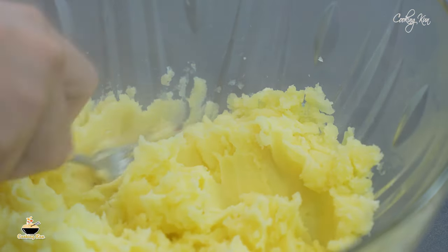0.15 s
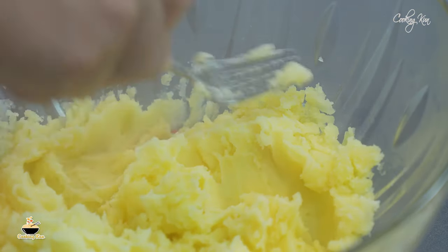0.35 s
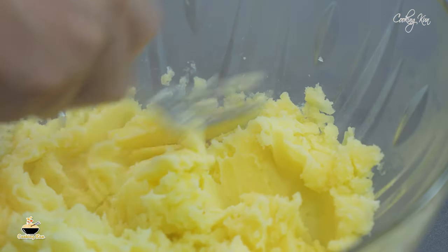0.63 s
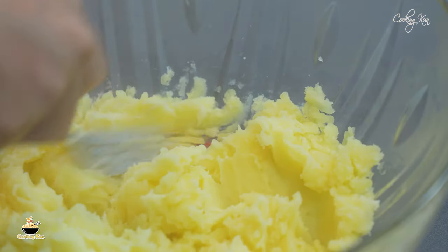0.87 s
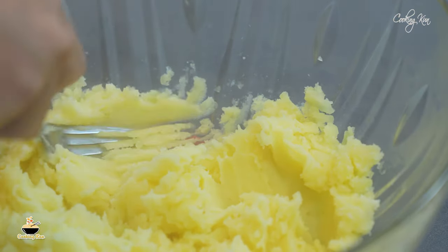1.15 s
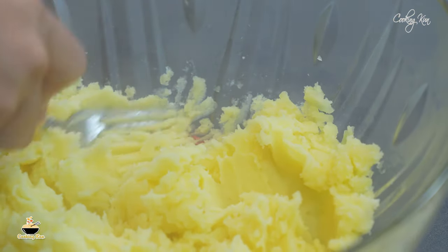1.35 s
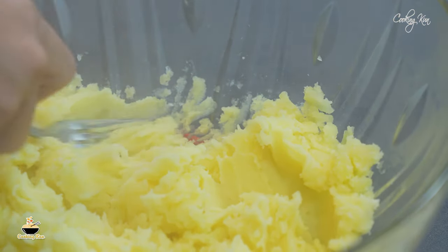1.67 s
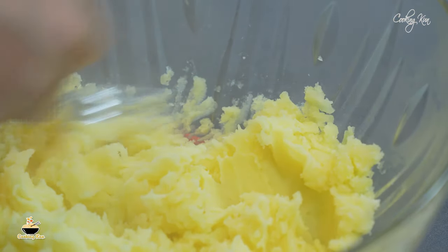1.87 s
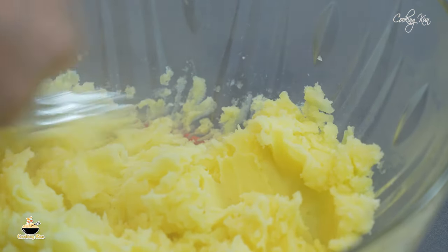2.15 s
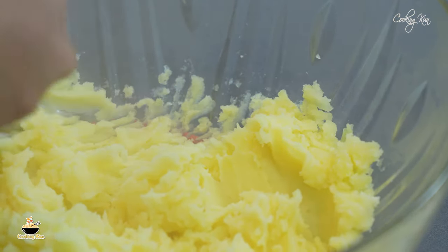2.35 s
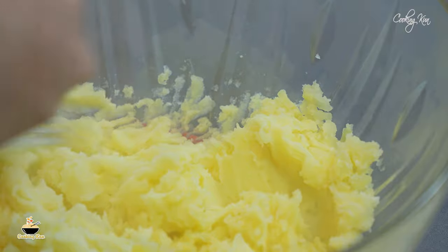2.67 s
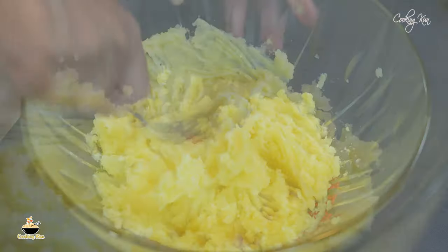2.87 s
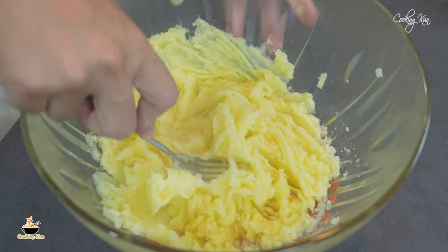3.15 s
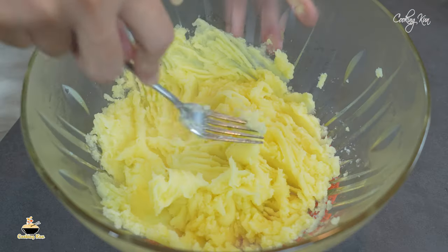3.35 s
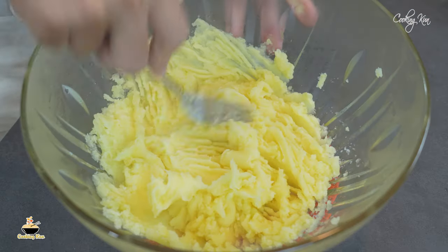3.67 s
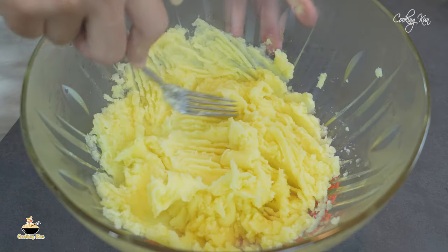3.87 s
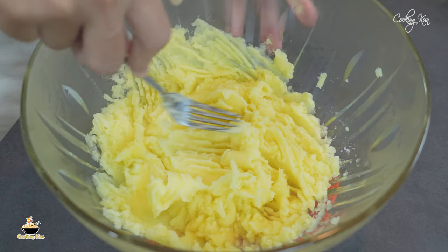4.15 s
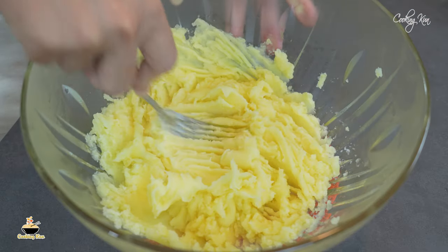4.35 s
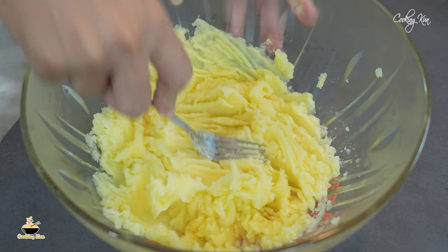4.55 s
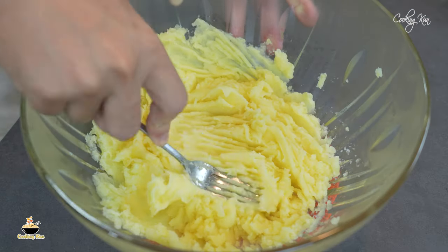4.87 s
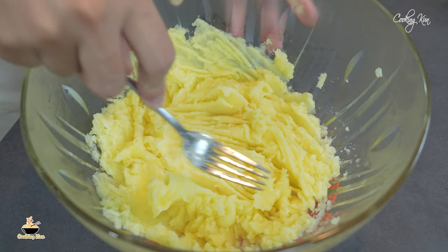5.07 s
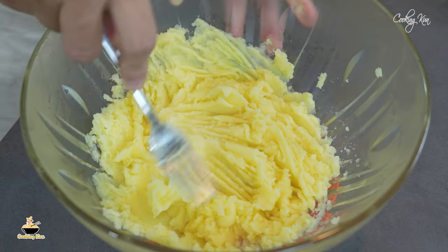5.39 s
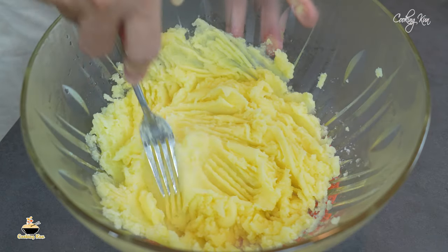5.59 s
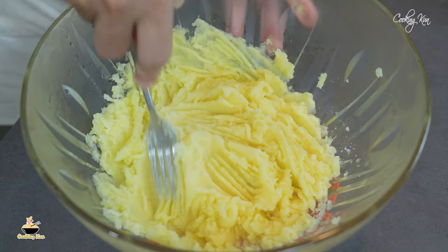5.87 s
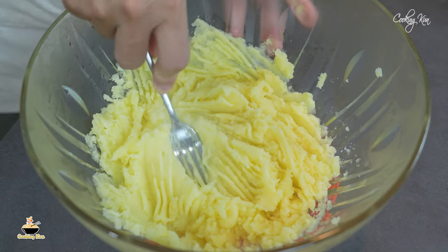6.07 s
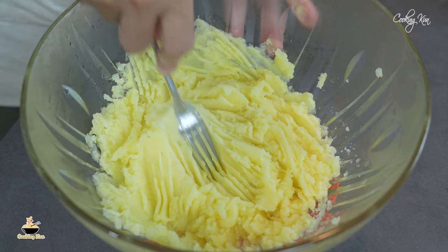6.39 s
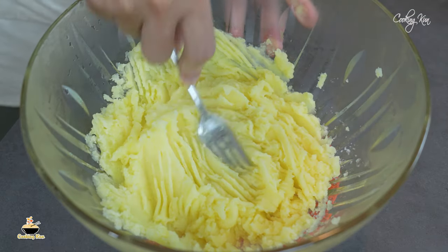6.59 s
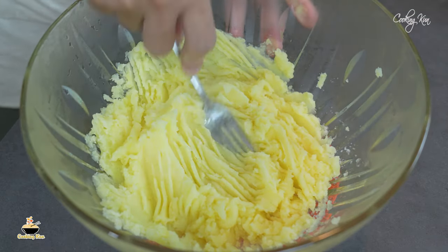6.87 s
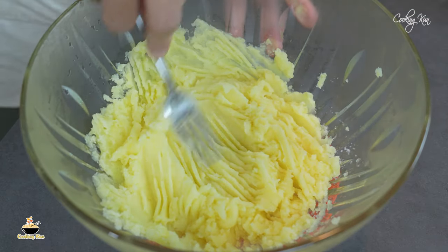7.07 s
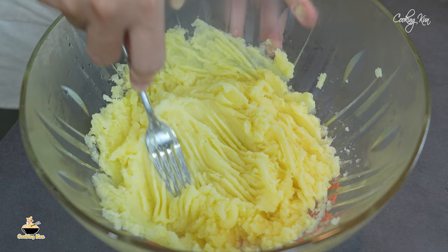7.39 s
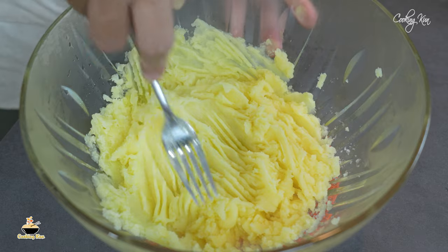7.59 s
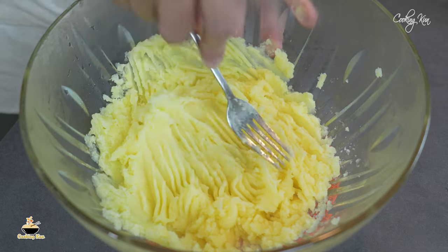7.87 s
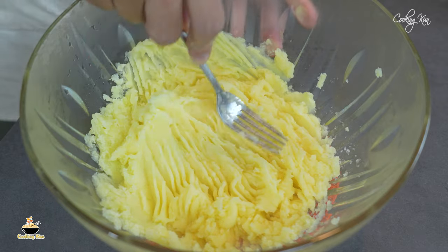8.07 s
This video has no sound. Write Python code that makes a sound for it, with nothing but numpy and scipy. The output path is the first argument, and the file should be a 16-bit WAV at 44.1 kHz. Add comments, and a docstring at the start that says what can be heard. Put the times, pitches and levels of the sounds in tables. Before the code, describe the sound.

Close fork mashing in a glass bowl: bright tine clinks and damped knocks give way to moist squelches, small snaps and soft worktop thuds.

```python
"""On a kitchen worktop, a steel fork mashes boiled potato in a glass bowl close by, and a hard room answers.
Tines clink on glass in the first three seconds; then the fork mostly pats the mash, with faint drags over
the glass near the end. Clinks, knocks, thumps and hollow snaps are sums of fading sine waves, most with bursts
of noise. Squelches and the drag hum are crackling noise, a squeak is a rising tone, the background is
wavering noise, and echoes are fading noise."""
import sys
import numpy as np
from scipy import signal
from scipy.fft import rfft, irfft, next_fast_len
from scipy.io import wavfile
from scipy.ndimage import map_coordinates

SR = 44100
rng = np.random.default_rng(int(sys.argv[2]) if len(sys.argv) > 2 else 0)


def transcribe(signal):
    """Save signal, clipped to [-1, 1], as a 16-bit WAV file at the path in sys.argv[1]."""
    frames = np.atleast_2d(signal).T
    limited = np.clip(frames, -1, 1)
    pcm = np.round(limited * 32767).astype(np.int16)
    wavfile.write(sys.argv[1], SR, pcm)


N = 363384  # length in samples


def amp(db):
    """Turn decibels into a plain multiplier."""
    return 10 ** (np.asarray(db) / 20)


def unit(x):
    """Scale a sound to an average (rms) level of 1."""
    return x / np.sqrt(np.mean(x ** 2) + 1e-20)


def along(points, hz):
    """Read a curve of (frequency, value) points, with frequency on a log axis."""
    point_hz, values = np.transpose(points)
    return np.interp(np.log(hz + 1), np.log(point_hz + 1), values)


def curves(rows):
    """Draw one value per sample for each column after the time."""
    times, *columns = np.transpose(rows)
    return [np.interp(np.arange(N) / SR, times, column) for column in columns]


def filtered(x, response):
    """Multiply each frequency of x by the response at that frequency."""
    size = next_fast_len(N + SR // 2)
    spectrum = rfft(x, size) * response(np.fft.rfftfreq(size, 1 / SR))
    return irfft(spectrum, size)[..., :N]


def colour(x, spectrum):
    """Shape x with a spectrum curve, then scale it to rms 1."""
    return unit(filtered(x, lambda hz: amp(along(spectrum, hz))))


def crackle(rate, spread_db, life):
    """Make noise in tiny fading bursts of very unequal size, about `rate` a second, `life` in seconds."""
    starts = rng.random(N) < rate / SR
    sizes = starts * amp(spread_db * np.minimum(rng.exponential(size=N), 3.5))
    bursts = signal.lfilter([1], [1, -np.exp(-1 / (life * SR))], sizes)
    return unit(bursts * rng.standard_normal(N))


def puff(db, t60):
    """Make a noise burst with the given peak level that falls 60 dB in t60 seconds."""
    t = np.arange(round(t60 * SR)) / SR
    burst = amp(-60 * t / t60) * rng.standard_normal(len(t))
    return amp(db) * burst / np.abs(burst).max()


def band(x, lo_hz, hi_hz):
    """Keep only the sound between two frequencies, the upper one at most 0.45 of the sample rate."""
    sos = signal.butter(3, [lo_hz, min(hi_hz, .45 * SR)], "bandpass", fs=SR, output="sos")
    return signal.sosfilt(sos, x)


def add(track, s, sound):
    """Mix a sound into the track at time s."""
    part = track[max(round(s * SR), 0):][:len(sound)]
    part += sound[:len(part)]


def ring(modes, extra_db, attack, scatter_db, turns, length):
    """Ring every mode (a natural tone of an object) after one blow, each time a little differently.

    extra_db gives the blow's level at each frequency; starting phases vary within `turns` of a cycle.
    """
    t = np.arange(round(length * SR)) / SR
    hz, db, t60 = np.transpose(modes)[..., None]
    db = db + extra_db(hz) + scatter_db * rng.standard_normal(hz.shape)
    tones = np.sin(2 * np.pi * (hz * t + turns * rng.random(hz.shape)))
    fading = amp(db - 60 * t / t60) * tones
    return fading.sum(0) * (1 - np.exp(-t / attack)) ** 2


def earlier_stroke():
    """The room still answers a clink that came just before: two bands of noise die away together."""
    fade = amp(-60 * np.arange(N) / SR / 0.54)
    noise = rng.standard_normal((2, N))
    dull = amp(-54) * unit(band(noise[0], 378, 2600))
    bright = amp(-52) * unit(band(noise[1], 6400, 6640))
    return fade * (dull + bright)


# background levels before wavering: (time [s], worktop's deep shake [dB], hum [dB], hiss [dB])
BACKGROUND_LEVELS = [(0, -52, -62.5, -55.5), (.3, -51.5, -64.5, -68), (.87, -71.5, -80, -71),
                     (1.45, -56, -65, -73), (2.0, -59.5, -58.5, -62), (2.6, -47.5, -70, -66),
                     (3.0, -71, -60, -66), (3.4, -88, -60.5, -68.5), (3.6, -61, -61.5, -72),
                     (4.2, -77.5, -61.5, -77), (4.6, -84, -71.5, -62), (4.9, -100, -95.5, -67.5),
                     (5.7, -74, -57, -68.5), (6.1, -81, -70.5, -68.5), (6.9, -86, -72, -72.5),
                     (7.4, -65.5, -54.5, -67.5), (7.8, -92.5, -79, -77.5), (8.24, -91.5, -98, -71.5)]
# relative spectra of the shake, the hum and the hiss: (frequency [Hz], level [dB per Hz])
DEEP_SPECTRUM = [(10, -15), (22, 12.5), (40, -4), (70, -33.5), (150, -81)]
HUM_SPECTRUM = [(50, -36), (80, 2.5), (105, 4), (150, -12.5), (200, -35), (500, -76.5)]
HISS_SPECTRUM = [(300, -45), (1800, -30), (2600, 1), (3600, 2.5), (4600, -6), (8000, -10), (16000, -10.5)]
WAVER_DB, WAVER_RATE = 3, 10  # typical size of the wavering [dB]; changes a second


def background():
    """Worktop rumble, a low hum and a hiss are shaped noise, and each wavers on its own."""
    noise = rng.standard_normal((3, N))
    spectra = (DEEP_SPECTRUM, HUM_SPECTRUM, HISS_SPECTRUM)
    out = np.zeros(N)
    for level_db, row, spectrum in zip(curves(BACKGROUND_LEVELS), noise, spectra):
        # random points joined by a smooth curve
        waver_db = WAVER_DB * map_coordinates(rng.standard_normal(200), [np.arange(N) * WAVER_RATE / SR])
        out += amp(level_db + waver_db) * colour(row, spectrum)
    return out


# the fork's pushes on the loaded bowl, levels before trims:
# (time [s], level [dB], level of the lowest modes [dB])
KNOCKS = [(0.155, -41.5, -47.5), (0.222, -28.5, -58), (0.469, -28.5, -57), (0.5581, -21, -84),
          (.578, -58, -83), (0.765, -39, -54), (0.833, -32, -77), (1.066, -36, -47), (1.357, -39, -45),
          (1.424, -31, -55), (1.673, -52.5, -56), (1.955, -37.5, -58), (2.011, -35.5, -65),
          (2.238, -21, -65), (2.307, -35, -47.5), (2.553, -31, -78), (2.83, -36.5, -58.5),
          (3.496, -35, -32), (3.739, -46.5, -62.5), (4.021, -40, -45), (4.05, -52, -43), (4.146, -51, -56),
          (4.747, -58, -86.5), (4.97, -52, -78), (4.99, -38, -81), (5.03, -46.5, -79), (5.213, -50, -48.5),
          (5.551, -39.5, -36), (5.614, -36, -40.5), (5.818, -41, -55.5), (6.336, -42.5, -79.5),
          (6.481, -61, -74), (6.625, -41, -74), (6.916, -45, -74.5), (7.201, -33.5, -29), (7.22, -35, -46),
          (7.239, -36, -32.5), (7.28, -44, -49), (7.962, -51.5, -69.5), (8.0, -58, -68),
          (8.203, -55.5, -57)]
# tones of the loaded bowl: (frequency [Hz], level [dB], time to fall 60 dB [s])
BOWL_MODES = [(288.6, -5, 0.089), (401.8, -1, 0.23), (418, -2.5, 0.22), (563, -14, 0.061), (622, -3.5, 0.1),
              (712, 0, 0.087), (851, -5, 0.037), (1121, 3.5, 0.046)]


def knocks():
    """The mash damps the bowl, so its low modes ring briefly over a rough thud."""
    rings, thuds, dull = np.zeros((3, N))
    for s, db, lower_db in KNOCKS:
        level = lambda hz: np.where(hz < 480, lower_db - 6.0, db - 16.5)
        add(rings, s, ring(BOWL_MODES, level, attack=0.001, scatter_db=3.5, turns=0.95, length=0.45))
        add(thuds, s, puff(db + 12.5, t60=0.016))
        add(dull, s, puff(lower_db + 10.5, t60=0.14))
    thuds = band(band(thuds, 490, 1500), 450, 3000)
    return rings + thuds + band(dull, 315, 520)


# tines hitting glass, levels before trims:
# (time [s], high ring's level [dB], body's level relative to it [dB])
CLINKS = [(0.1566, -10.5, -13), (0.1857, -31.5, 6), (0.4707, -12.5, -11), (0.7677, -7, -15.5),
          (0.7904, -26, 6.5), (1.068, -7.5, -13), (1.0955, -30, 2.5), (1.3599, -11, -8),
          (1.6677, -22.5, 7.5), (1.6778, -36, -1.5), (1.9616, -17.5, 1), (1.9734, -36.5, 2),
          (2.5512, -30, 7), (2.834, -19, 4.5), (2.8404, -35.5, -9.5), (2.863, -39, 6)]
# tones of fork and glass: (frequency [Hz], level [dB], time to fall 60 dB [s])
GLASS_MODES = [(1487, -15, 0.05), (2102, 2.5, 0.019), (2472, 7, 0.019), (3208, 8, 0.015), (3723, 5, 0.011),
               (6503, -6, 0.033), (6547, -10, 0.028), (6620, -22, 0.016), (7036, -11, 0.03),
               (7500, -5.5, 0.024), (8080, 1, 0.017), (8400, -8, 0.0245), (9990, -1.5, 0.017),
               (10440, -5.5, 0.018), (12150, -9, 0.013), (12990, -8.5, 0.015), (15700, -9.5, 0.018)]
TOP_DB, TOP_FOLLOWS = -6, 0.38  # top modes relative to the high ring [dB]; dB they gain per dB of body


def clinks():
    """Fork and glass ring shortly over a dull and a bright crack at the contact."""
    rings, dull, bright = np.zeros((3, N))
    for s, db, body_db in CLINKS:
        top_db = TOP_DB + TOP_FOLLOWS * body_db
        # body below 5 kHz, high ring up to 7 kHz, top modes above
        level = lambda hz: db + np.where(hz < 5000, body_db - 9, np.where(hz < 7000, 0, top_db))
        start = s - .001
        add(rings, start, ring(GLASS_MODES, level, attack=0.00047, scatter_db=2.0, turns=0.16, length=.15))
        add(dull, start, puff(db + body_db + 10, t60=0.026))
        add(bright, start, puff(db + top_db + 5, t60=0.028))
    return band(rings, 720, 20000) + band(dull, 1654, 3420) + band(bright, 6400, 22000)


# how fast echoes die: (frequency [Hz], time to fall 60 dB [s])
ROOM_FADE = [(200, 0.47), (1000, 0.57), (3000, 0.51), (7000, 0.52), (15000, 0.46)]
# how loud the echoes are: (frequency [Hz], echo level [dB])
ROOM_LEVEL = [(200, -8), (450, -4), (1000, 0), (3000, -7.5), (7000, -7.5), (15000, -14)]


def room(x):
    """Echoes die at their own speed at each frequency; each third of a second of sound gets a new pattern."""
    out, step = np.zeros(N + SR), SR // 3
    for start in range(0, N, step):
        hz, t, noise = signal.stft(rng.standard_normal(SR), SR, nperseg=256)
        fade = amp(-60 * t / along(ROOM_FADE, hz)[:, None])
        energy = np.sum(fade ** 2, 1, keepdims=True) * 128  # 128 samples between frames
        fade *= amp(along(ROOM_LEVEL, hz))[:, None] / np.sqrt(energy)
        tail = signal.istft(noise * fade, SR, nperseg=256)[1][:SR - 400]
        # the echoes begin 300 samples after the sound
        add(out, (start + 300) / SR, signal.fftconvolve(x[start:start + step], tail))
    return out[:N]


# small random snaps: level over the squelch's wet body [dB], treble over its fizz [dB], spread [dB]
SMALL_HOLLOW_DB, SMALL_TREBLE_DB, SMALL_SCATTER_DB = 10, 12, 3.5
STRAY_DB, STRAY_SCATTER_DB = -50.5, 2.5  # faint snaps as the mash settles: level before trims, spread


def small_snaps(count, stray_count):
    """Scatter `count` snaps around each squelch, and faint strays anywhere, as (s, hollow dB, treble dB)."""
    s, half, fizz_db, wet_db = np.repeat(SQUELCHES, count, 0).T
    when, low, high = rng.standard_normal((len(s), 3)).T
    hollow_db = wet_db + SMALL_HOLLOW_DB + SMALL_SCATTER_DB * low
    treble_db = fizz_db + SMALL_TREBLE_DB + SMALL_SCATTER_DB * high
    inside = np.transpose([s + half * when, hollow_db, treble_db])
    stray_levels = STRAY_DB + STRAY_SCATTER_DB * rng.standard_normal((stray_count, 2))
    strays = np.c_[rng.random(stray_count) * N / SR, stray_levels]
    return np.vstack([inside, strays])


# snaps of sticky mash off the tines at set times, strong and faint, levels before trims:
# (time [s], level in the bowl's hollow [dB], treble relative to it [dB])
SNAPS = [(0.2224, -26.5, -2), (0.5232, -27, -8.5), (0.5586, -21.5, -23), (0.603, -32, -12),
         (0.8324, -33.5, -9.5), (0.9438, -30.5, -2.5), (1.5494, -29, -16), (1.5604, -28, -14.5),
         (1.8307, -32, -5.5), (2.2554, -25.5, -5.5), (2.2648, -19, -11), (2.2884, -30.5, -18.5),
         (2.3934, -45.5, 5), (2.5546, -28, -13), (2.5644, -22.5, -8), (2.6758, -37.5, -13.5),
         (2.9522, -50.5, -10.5), (3.1682, -37, -5.5), (3.2136, -33.5, -9.5), (3.2625, -39.5, -2),
         (3.3114, -31, -22), (3.3324, -39, -4), (3.46, -41, 6), (3.4874, -23, -0.5), (3.4929, -28, -24),
         (3.6017, -40, -6.5), (3.7394, -30, -20.5), (3.7868, -24, -12), (3.8033, -25.5, -16.5),
         (3.8906, -31, -6.5), (4.0696, -17, -17), (4.151, -27.5, -23), (4.1924, -30, -15),
         (4.1974, -33.5, -9), (4.369, -37.5, -13), (4.4323, -33, -8), (4.6314, -41.5, 3.5),
         (4.6514, -44.5, -2.5), (4.9104, -32.5, -1.5), (4.9167, -36, -4.5), (4.9964, -39.5, -0.5),
         (5.0479, -48, 8.5), (5.0619, -36.5, 1.5), (5.3472, -43.5, 3), (5.6436, -34, -6),
         (5.6644, -50.5, 2.5), (5.884, -40.5, -12.5), (5.9529, -38, -9), (5.9808, -50.5, -2),
         (6.1519, -43, -3), (6.2174, -44, 0), (6.2484, -39.5, -9.5), (6.3395, -37.5, -11.5),
         (6.3814, -33, -12.5), (6.4792, -39, 2), (6.6253, -35, -6.5), (6.6498, -27, -2),
         (6.6727, -31.5, -3.5), (6.6937, -27.5, -5.5), (6.7441, -41, 2), (6.782, -70, -4),
         (6.9381, -25.5, -18.5), (6.9825, -36.5, -2.5), (7.0638, -33, -14), (7.2205, -25, -22),
         (7.3108, -40, 2), (7.5807, -48, 5), (7.7568, -54, 4), (7.8376, -43, -4.5), (7.9897, -47, 3),
         (8.099, -39, -14.5)]
# tones of the air in the bowl: (frequency [Hz], level [dB], time to fall 60 dB [s])
HOLLOW_MODES = [(1150, -20, 0.0071), (1840, -16, 0.0066), (2990, -5.5, 0.0054), (3583, 1, 0.0054),
                (3930, -10, 0.0013)]


def snaps():
    """Sticky mash lets go with a tick: the bowl's hollow rings briefly, with a tiny puff of treble."""
    hollow, bright = np.zeros((2, N))
    timed = [(s, db, db + treble_db) for s, db, treble_db in SNAPS]
    for s, hollow_db, bright_db in timed + list(small_snaps(count=2, stray_count=60)):
        level = lambda hz: hollow_db - 0.5
        tick = ring(HOLLOW_MODES, level, attack=.0001, scatter_db=3, turns=0.19, length=.012)
        add(hollow, s + 0.00073, tick)
        add(bright, s + .0008, puff(bright_db + 8, t60=0.0056))
    return band(hollow, 1400, 12000) + band(bright, 4800, 18140)


# the bowl thumping on the worktop, levels before trims:
# (time [s], level [dB], upper modes relative to it [dB])
THUMPS = [(0.225, -49, -14), (0.768, -61.5, 9), (1.378, -46, -0.5), (1.955, -46.5, -9.5),
          (2.275, -38.5, -7.5), (2.6, -41, -20), (3.495, -34, -4.5), (4.062, -37, -13.5),
          (5.216, -55, -14.5), (5.566, -28, -8), (6.335, -47, -15), (6.62, -65.5, 0), (7.201, -29.5, -0.5),
          (7.238, -39.5, 8.5), (7.959, -66.5, 0.5), (8.199, -65, 9)]
# tones of the worktop: (frequency [Hz], level [dB], time to fall 60 dB [s])
WORKTOP_MODES = [(36.4, -8, 0.42), (60.36, -3, 0.53), (93.4, 5.5, 0.25), (141.5, -2, 0.34),
                 (185, -11.5, 0.33)]
CONTACT_S = 0.0051  # how slowly a thump sets in


def thumps():
    """A soft contact swings the worktop up slowly, and its deep tones ring on."""
    out = np.zeros(N)
    for s, db, upper_db in THUMPS:
        level = lambda hz: db + 6.0 + np.where(hz < 75, 0, upper_db - 4.0)
        thump = ring(WORKTOP_MODES, level, attack=CONTACT_S, scatter_db=4.0, turns=0.081, length=0.69)
        add(out, s - .003, thump)
    return out


# mash squeezed through the tines, levels before trims:
# (time of the peak [s], half length before stretching [s], fizz level [dB], wet body level [dB])
SQUELCHES = [(0.344, .016, -59, -50), (0.646, .016, -56, -52), (0.94, .023, -59, -57),
             (1.241, .043, -60, -50.5), (1.562, .041, -57, -51.5), (1.815, .041, -56, -47.5),
             (2.129, .014, -54.5, -48.5), (2.3, .058, -62.5, -46.5), (2.422, .036, -55.5, -51.5),
             (2.69, .056, -59, -51.5), (2.951, .018, -58, -47.5), (3.185, .026, -59, -57.5),
             (3.321, .012, -54, -56.5), (3.49, .009, -46, -42.5), (3.603, .01, -51, -49.5),
             (3.78, .02, -56.5, -54), (3.896, .0085, -49, -50), (4.046, .023, -63, -51.5),
             (4.149, .0067, -53, -43.5), (4.193, .01, -56, -74), (4.338, .018, -62, -59),
             (4.453, .02, -57, -58), (4.739, .017, -57, -58), (4.928, .028, -61.5, -56),
             (5.006, .017, -52.5, -47), (5.061, .015, -48.5, -46.5), (5.245, .041, -64.5, -55),
             (5.349, .013, -55, -49), (5.595, .054, -82.5, -53.5), (5.666, .015, -53, -51),
             (5.825, .02, -66.5, -57.5), (5.951, .027, -59, -59), (6.237, .01, -51.5, -55),
             (6.378, .033, -60.5, -60.5), (6.494, .015, -52.5, -52.5), (6.686, .03, -64, -53.5),
             (6.787, .0085, -48, -51), (6.936, .02, -60, -55.5), (7.06, .014, -52.5, -54.5),
             (7.234, .019, -74, -44.5), (7.271, .042, -78.5, -55.5), (7.324, .017, -59.5, -54.5),
             (7.585, .0074, -59, -66.5), (7.752, .02, -65, -68.5), (7.841, .013, -57.5, -69.5),
             (7.991, .015, -60, -61), (8.092, .01, -54, -57), (8.209, .012, -74, -65)]
# relative spectra of the fizz, the wet body and the low slop: (frequency [Hz], level [dB per Hz])
FIZZ_SPECTRUM = [(1500, -72), (4500, -10), (7000, -2), (9000, 1), (12000, 0), (15500, -4.5)]
WET_SPECTRUM = [(500, -70), (1300, -28.5), (2000, -3), (2600, -4.5), (3600, 0.5), (4500, -9), (6000, -19),
                (9000, -37)]
SLOP_SPECTRUM = [(300, -57.5), (550, -1.5), (720, -1.5), (1000, -4), (1500, -6), (2600, -50.5)]
RISE_SHARE, FALL_SHARE = 1.08, 0.79  # stretch of the half length before and after the peak
# slop level before its trim [dB]; dB gained per dB of wet body; dB lost per dB of fizz over the body
SLOP_DB, SLOP_FOLLOWS, FIZZ_THINS = -59, 2.2, .4


def squelch():
    """Air pockets in the mash fizz and crackle while the tines press in or pull out."""
    swells = np.zeros((3, N))
    t = np.arange(-SR // 4, SR // 4) / SR
    for s, half, fizz_db, wet_db in SQUELCHES:
        width = max(half, .003) * np.where(t < 0, RISE_SHARE, FALL_SHARE)
        shape = amp(-6 * np.abs(t / width) ** 1.83)
        slop_db = SLOP_DB + SLOP_FOLLOWS * (wet_db + 51) - FIZZ_THINS * (fizz_db - wet_db)
        for swell, db in zip(swells, (fizz_db, wet_db, slop_db)):
            add(swell, s - .25, amp(db) * shape)
    grains = crackle(rate=900, spread_db=3.5, life=0.00075) + 0.62 * rng.standard_normal(N)
    fizz = swells[0] * amp(2.0) * colour(grains, FIZZ_SPECTRUM)
    wet = swells[1] * amp(-3.0) * colour(grains, WET_SPECTRUM)
    slop = swells[2] * amp(-13.5) * colour(grains, SLOP_SPECTRUM)
    return fizz + wet + slop


# the fork's back dragging over the glass: (time [s], length before the fade-out [s], level [dB])
DRAGS = [(0.352, 0.17, -53.5), (7.711, 0.036, -71), (7.814, 0.036, -85), (8.07, 0.036, -75)]
# relative spectrum of the hum, strongest at one bowl mode: (frequency [Hz], level [dB per Hz])
DRAG_SPECTRUM = [(500, -67), (660, 2.5), (727, 10.5), (800, -10), (1100, -20), (1500, -62)]


def drags():
    """The dragging fork makes one bowl mode hum: it starts abruptly, eases off, then fades out."""
    t = np.arange(N) / SR
    pull = np.zeros(N)
    for s, length, db in DRAGS:
        pull += amp(db) * np.interp(t, [s, s + .006, s + length, s + length + .04], [0, 1, .7, 0])
    return pull * colour(crackle(rate=150, spread_db=3.5, life=0.0047), DRAG_SPECTRUM)


# air escaping a pocket: time [s], length [s], from frequency [Hz], to frequency [Hz], level [dB]
SQUEAK = (5.385, .045, 4400, 4650, -72)


def squeak():
    """Escaping air gives a faint whistle whose pitch rises steadily."""
    s, length, from_hz, to_hz, db = SQUEAK
    out = np.zeros(N)
    progress = np.linspace(0, 1, round(length * SR))
    cycles = np.cumsum(from_hz + (to_hz - from_hz) * progress) / SR
    swell = np.sin(np.pi * progress) ** .5
    add(out, s, amp(db) * swell * np.sin(2 * np.pi * cycles))
    return out


# faint difference between left and right: (frequency [Hz], side level relative to the middle [dB])
SIDE_LEVEL = [(60, -53), (1000, -34), (4000, -43), (12000, -31)]
ECHO_BREAK_S = 2.892  # the echoes so far stop short here, and only later sounds echo on


def scene():
    """Mix the sources with the room's echoes, then spread the mix slightly to left and right."""
    near = snaps() + squelch() + squeak()
    dry = clinks() + knocks() + drags()
    sent = dry + amp(-4) * near  # the mash sounds are close to the microphone, so they send less into the room
    first = np.arange(N) < ECHO_BREAK_S * SR
    echoes = np.where(first, room(sent * first), room(sent * ~first))
    mid = dry + near + echoes + thumps() + earlier_stroke() + background()
    # the side is a faint copy, 40 samples late and turned a quarter cycle
    side = filtered(np.roll(mid, 40), lambda hz: 1j * amp(along(SIDE_LEVEL, hz)))
    return np.array([mid + side, mid - side])


ROLL_HZ, TOP_HZ = 15900, 17100  # where the treble turns weak, and where it ends


def record(dry):
    """Weaken the highest treble by 32 dB and let nothing through from the top limit up."""
    return filtered(dry, lambda hz: np.where(hz < ROLL_HZ, 1, amp(-32.0)) * (hz < TOP_HZ))


dry = scene()
out = record(dry)
transcribe(out)
```